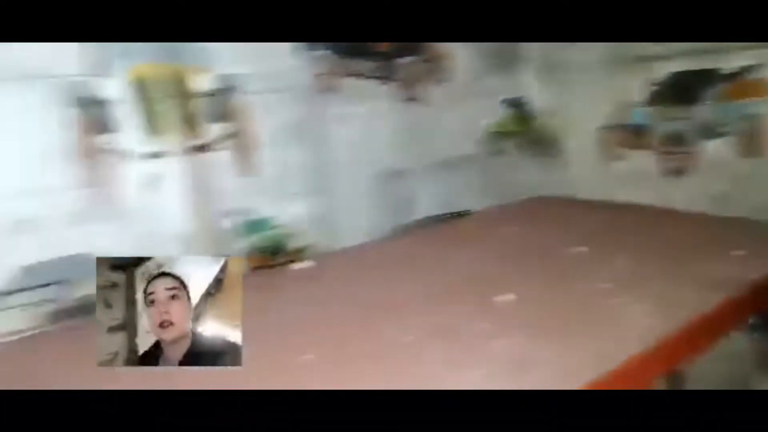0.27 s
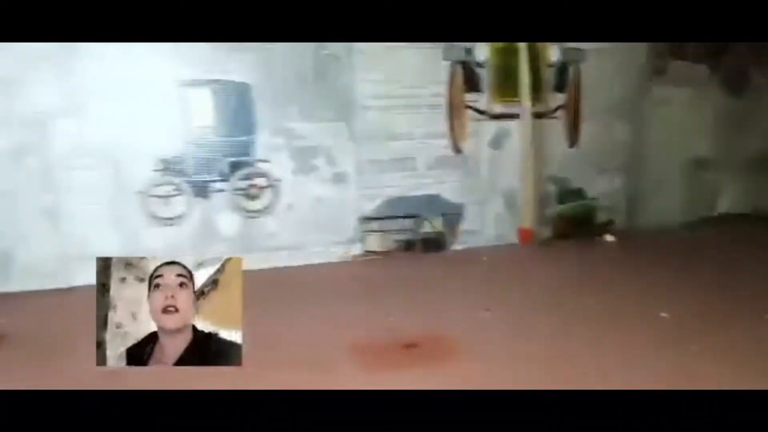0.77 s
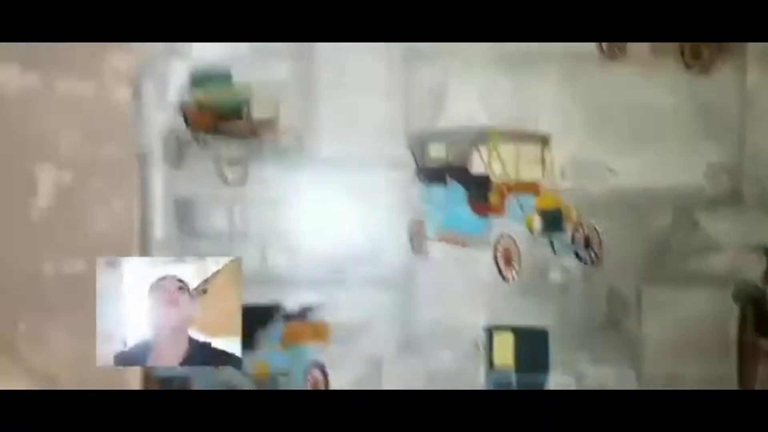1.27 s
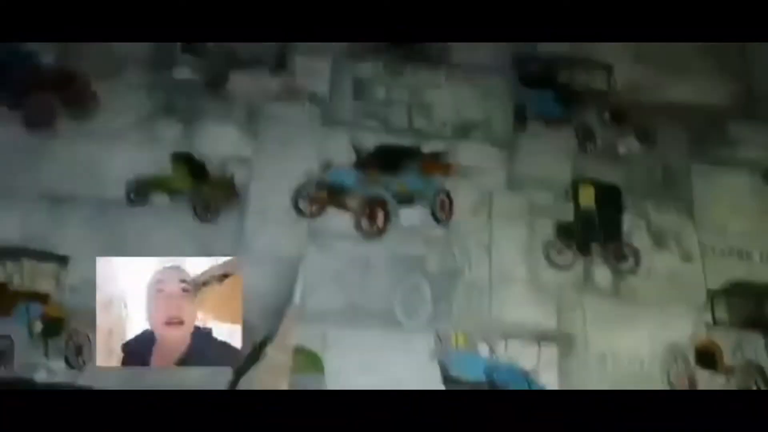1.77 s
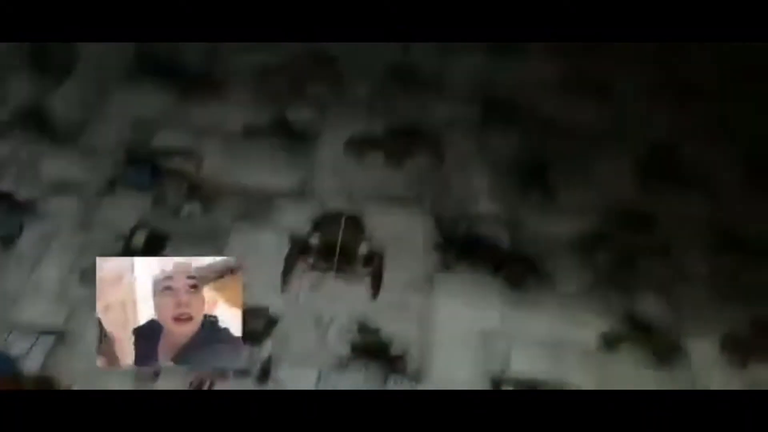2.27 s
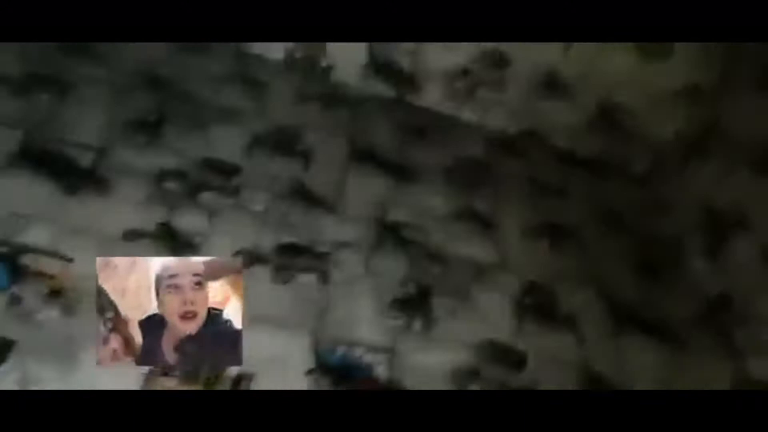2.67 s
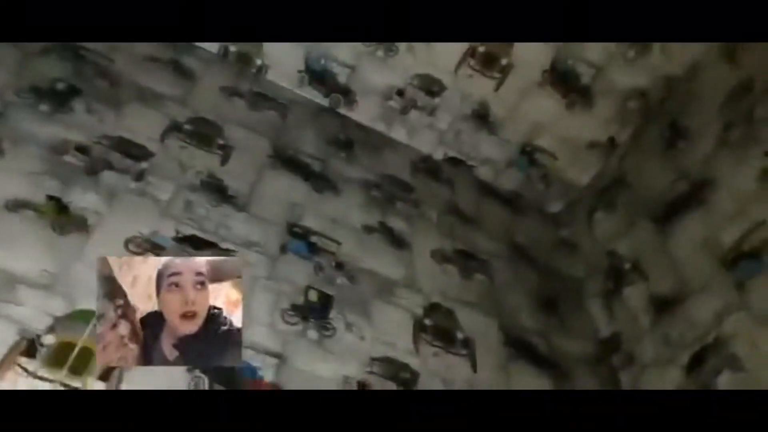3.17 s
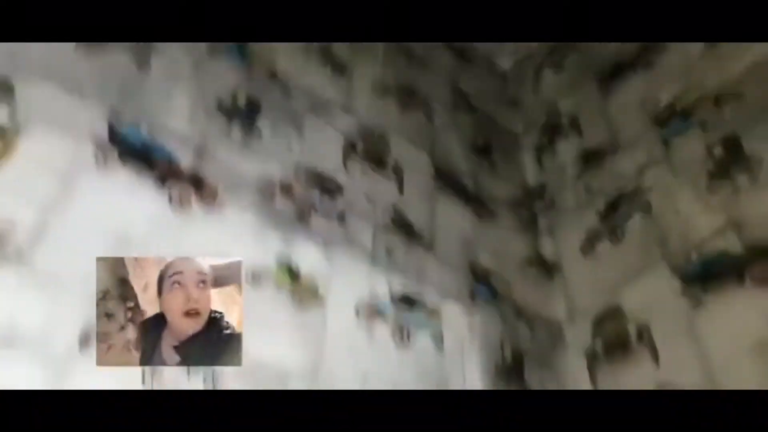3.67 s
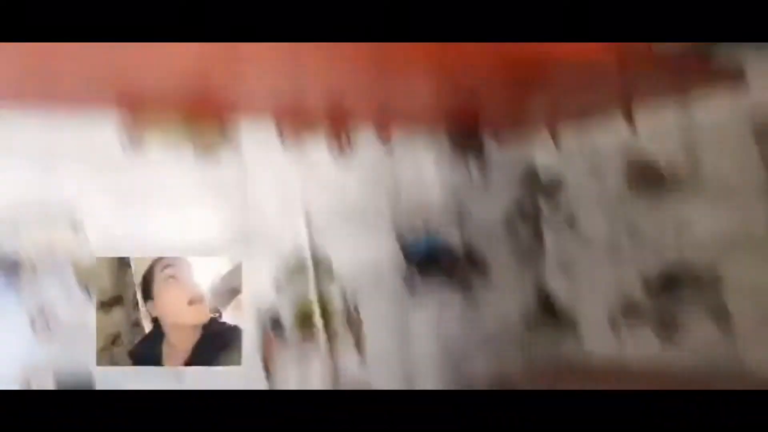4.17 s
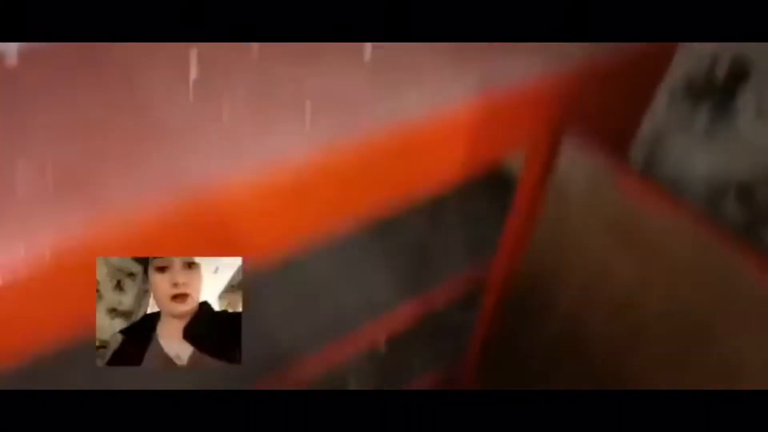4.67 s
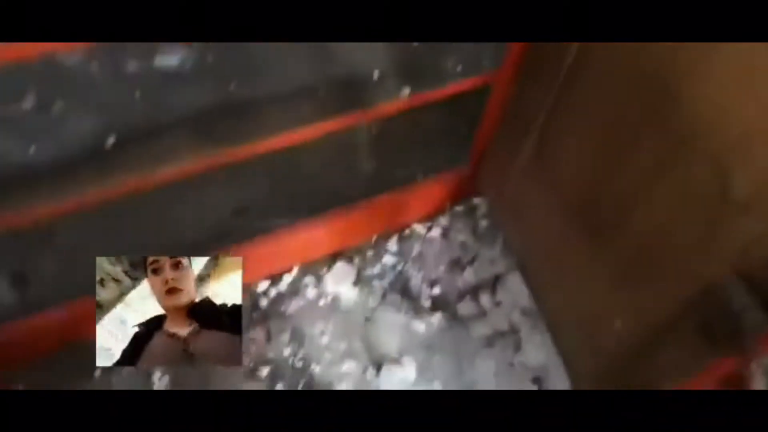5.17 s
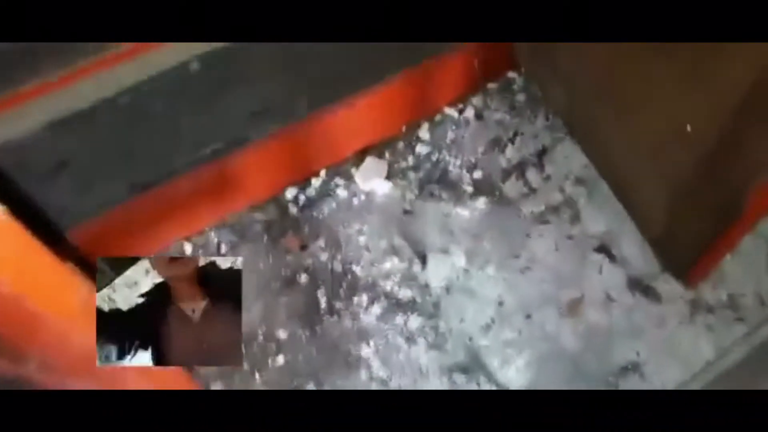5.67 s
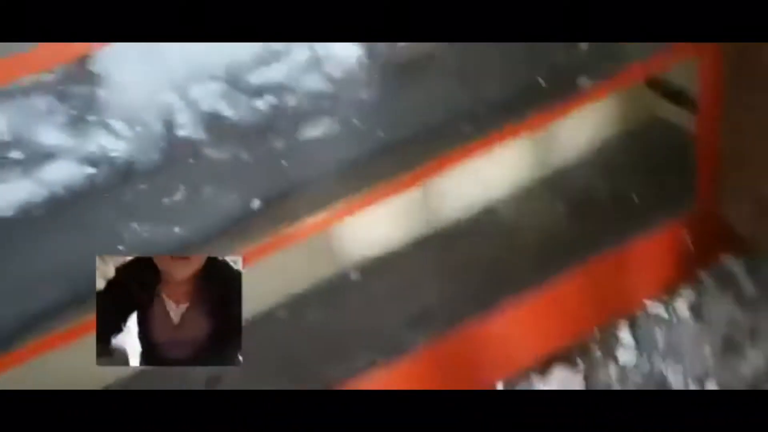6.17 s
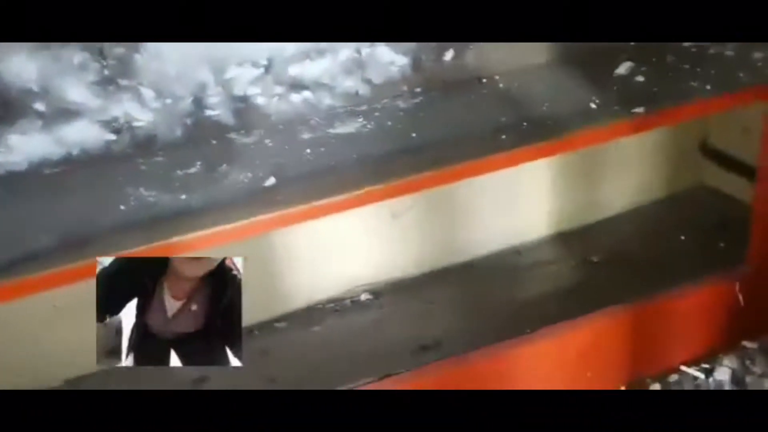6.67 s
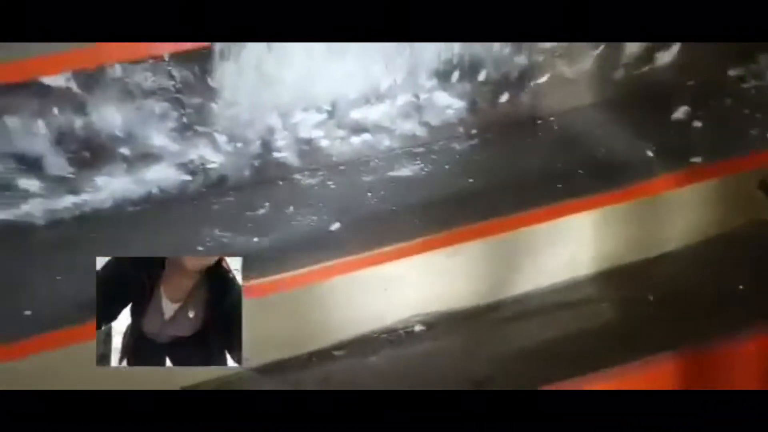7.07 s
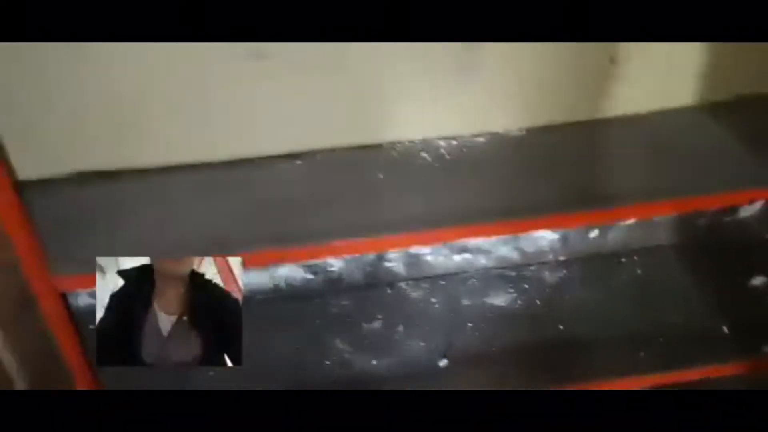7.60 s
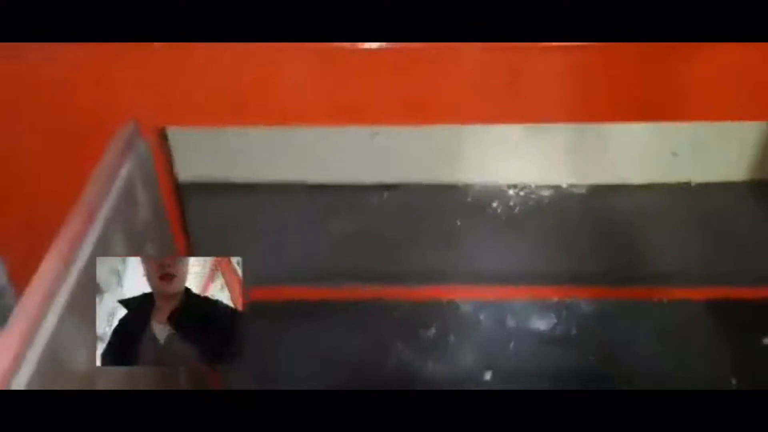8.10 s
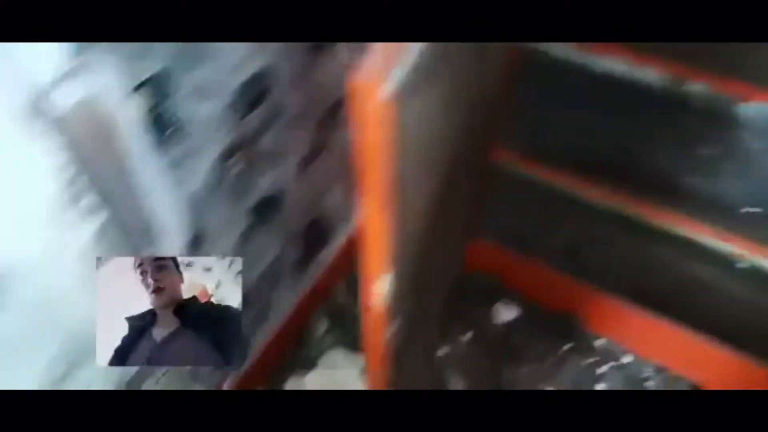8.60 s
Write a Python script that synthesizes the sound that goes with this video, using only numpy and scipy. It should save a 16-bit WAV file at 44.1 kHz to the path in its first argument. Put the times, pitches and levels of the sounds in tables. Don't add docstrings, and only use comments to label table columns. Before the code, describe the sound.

Close, careful footsteps drag through gritty debris, snapping glass shards and thudding on hollow wooden stairs, building to two violent glass crunches.

```python
import sys
import numpy as np
from scipy import signal
from scipy.fft import rfft, irfft, next_fast_len
from scipy.io import wavfile
from scipy.ndimage import uniform_filter1d, map_coordinates

SR = 44100
rng = np.random.default_rng(int(sys.argv[2]) if len(sys.argv) > 2 else 0)


def transcribe(u):
    v = np.clip(np.atleast_2d(u).T, -1, 1)
    q = np.round(v * 32767).astype(np.int16)
    wavfile.write(sys.argv[1], SR, q)


def amplitude_ratio(level_db):
    exponent = np.asarray(level_db, float) / 20
    return 10 ** exponent


N = 389844

# (time [s], left-right level [dB])
TURN = [(0, -5), (1.0, -6.5), (1.3, -2.5), (1.8, -3), (2.2, -6), (2.75, -2), (3.2, 2), (4.6, -7),
        (5.1, -3.5), (6.3, -7), (6.8, -1), (7.2, 0), (7.8, -2), (8.2, -4), (8.84, -3.5)]


def unit(x):
    return x / np.sqrt(np.mean(x ** 2) + 1e-20)


def along(points, hz):
    f, v = np.transpose(points)
    return np.interp(np.log(hz + 1), np.log(f + 1), v)


def curves(rows):
    s, *cols = np.transpose(rows)
    return [np.interp(np.arange(N) / SR, s, c) for c in cols]


def wobble(rate):
    grid_s = np.arange(0, N / SR + .01, .001)
    knots = rng.standard_normal(int(N * rate / SR) + 4)
    return np.interp(np.arange(N) / SR, grid_s, map_coordinates(knots, [grid_s * rate]))


def patches(shape, bins, frames):
    field = uniform_filter1d(rng.standard_normal(shape), bins, -2)
    return unit(uniform_filter1d(field, frames, -1))


def swells(rows, rise_s, bend):
    t = np.arange(0, N / SR + .01, .001)
    power = 0
    for s, db, fall_s, *layer_db in rows:
        away = np.where(t < s, (s - t) / (rise_s or fall_s), (t - s) / fall_s)
        level_db = db - 20 * away ** bend
        power = power + amplitude_ratio(np.add.outer([0, *layer_db], level_db)) ** 2
    return np.array([np.interp(np.arange(N) / SR, t, p) for p in power])


def filtered(x, response):
    m = next_fast_len(N + SR // 2)
    return irfft(rfft(x, m) * response(np.fft.rfftfreq(m, 1 / SR)), m)[..., :N]


def coloured(x, spectrum):
    return filtered(x, lambda hz: unit(amplitude_ratio(along(spectrum, hz))))


def pan(db):
    return amplitude_ratio(np.array([db / 2, -db / 2]))


def ports(pair, lag_s, near=0):
    # (frequency [Hz], left-right likeness [0-1])
    alike = [(40, 0.5), (200, 0.823), (600, 1), (1500, 0.22), (5000, 0.097), (12000, 0.17)]
    m = next_fast_len(N + 4096)
    hz = np.fft.rfftfreq(m, 1 / SR)
    likeness = near + (1 - near) * along(alike, hz)
    angle = np.arccos(np.clip(likeness, -1, 1)) / 2
    mid, side = rfft(pair, m) * [np.cos(angle), np.sin(angle)]
    late = np.exp(-1j * np.pi * hz * lag_s)
    return irfft(np.array([(mid + side) * late, (mid - side) / late]), m)[:, :N]


def hush():
    # (frequency [Hz], level [dB per Hz])
    air = [(90, -29), (150, -0.5), (263, -5.5), (684, -16.5), (1220, -16), (3400, -22.5), (7400, -19),
           (13000, -28.5)]
    return amplitude_ratio(-65 + 0.52 * wobble(8.9)) * coloured(rng.standard_normal((2, N)), air)


def hand_shake():
    # (time [s], level [dB])
    unrest = [(0.0, -60.5), (0.81, -69.5), (1.23, -56), (1.72, -65.5), (5.02, -64.5), (5.07, -66),
              (5.19, -73), (5.24, -52), (5.39, -69), (5.91, -48.5), (5.98, -74), (6.03, -58.5), (7.8, -64),
              (7.85, -78), (8.0, -54), (8.84, -69.5)]
    # (frequency [Hz], level [dB per Hz])
    rumble = [(12, -28), (25, -4.5), (50, 5), (75, -8.5), (120, -39)]
    noise = amplitude_ratio(4.1 * wobble(7.4)) * rng.standard_normal((2, N))
    return amplitude_ratio(curves(unrest)[0]) * coloured(noise, rumble)


def boom(modes):
    def wood(f):
        return sum((-1) ** k * amplitude_ratio(db) * 1j * f * width / (hz * hz - f * f + 1j * f * width)
                   for k, (hz, width, db) in enumerate(modes))
    return unit(filtered(amplitude_ratio(2.1 * wobble(14)) * rng.standard_normal((2, N)), wood))


def stairs():
    # (time [s], tread level [dB], time to lose 20 dB [s], joist level [dB])
    loads = [(.2, -52, 0.4, -2.5), (.91, -52.5, 0.76, -0.5), (1.16, -47.5, 0.4, -3.5),
             (1.28, -57.5, 1.4, -3), (1.63, -52, 0.24, -8), (2.09, -47, 0.06, -4), (2.5, -60, 0.5, -5),
             (3.8, -53, 0.66, -6), (4.4, -63.5, 2.5, -6.5), (4.99, -55, 1, -19), (5.1, -39, 0.14, -4),
             (5.4, -49, 0.47, -5), (5.72, -48.5, 0.7, -6.5), (6.1, -44.5, 0.1136, -10.5),
             (6.36, -50, 0.32, -11), (6.81, -42.5, 0.21, -14.5), (7.41, -57.5, 0.6, -1.5),
             (7.78, -43, 0.18, -16), (7.95, -40, .22, -12), (8.17, -44.5, 0.15, -1.5),
             (8.49, -55, 0.26, -12), (8.72, -53, 0.04, -19)]
    # (frequency [Hz], width [Hz], level [dB])
    tread_modes = [(183, 22.4, 2.5), (205.3, 22.2, 2.5), (256, 17.6, 1.5), (380, 280, -12.5)]
    # (frequency [Hz], width [Hz], level [dB])
    joist_modes = [(88.7, 6.8, 4.5), (128.5, 16, 1)]
    rest_db = -67.5
    tread, joist = np.sqrt(swells(loads, rise_s=0.052, bend=1.02) + amplitude_ratio(rest_db) ** 2)
    steps = amplitude_ratio(-1.0) * (tread * boom(tread_modes) + amplitude_ratio(1.8) * joist * boom(joist_modes))
    low = ports(steps + hand_shake(), lag_s=.0001) + knocks()
    return low * pan(3.8)[:, None]


def crackle(rate, spread_db, hiss, patchy_db):
    slips = (rng.random(N) < rate / SR) * amplitude_ratio(spread_db * rng.exponential(size=N))
    decay = amplitude_ratio(-60 * np.arange(200) / SR / 0.0045)
    shape = np.convolve(slips, decay)[:N]
    force = np.sqrt(hiss + (1 - hiss) * unit(shape) ** 2)
    z = signal.stft(force * rng.standard_normal((2, N)), nperseg=512)[2]
    colour = amplitude_ratio(patchy_db * patches(z.shape[1:], bins=3, frames=6))
    return unit(signal.istft(z * colour, nperseg=512)[1][:, :N])


def debris(source, grit, plaster, dust):
    # (frequency [Hz], level [dB per Hz])
    grit_hz_db = [(900, -76), (1400, -14.5), (1800, -1.5), (2600, 1.5), (3300, -3.5), (4100, -3),
                  (4900, -6.5), (5800, -19.5), (7500, -39)]
    # (frequency [Hz], level [dB per Hz])
    plaster_hz_db = [(110, -43.5), (200, -7), (320, -13), (600, -2.5), (1000, 0.5), (1400, 3),
                     (1900, -11.5), (3000, -58)]
    # (frequency [Hz], level [dB per Hz])
    dust_hz_db = [(200, -39), (3500, -30), (4800, -15), (5800, -5.5), (7100, 0.5), (8000, -2.5),
                  (10000, -5.5), (13000, -10)]
    return (grit * coloured(source, grit_hz_db)
            + plaster * coloured(source, plaster_hz_db)
            + dust * coloured(source, dust_hz_db))


def scuff():
    # (time [s], grit level [dB], time to lose 20 dB [s], plaster [dB], dust [dB])
    landings = [(.032, -53, 0.0953, 2, -13), (1.12, -47, 0.9, -3, 0.5), (2.787, -44, 0.1475, -2.5, -2.5),
                (3.17, -73, .15, 6, 3.5), (3.663, -41, 0.22, -9.5, -9), (4.055, -51, 0.26, -25, 3),
                (4.929, -42, 0.2221, -9, -19), (6.794, -43.5, 0.08, -5, -25), (6.83, -55, 0.05, -2, -22.5),
                (7.158, -28.5, 0.2, -18, 0), (7.814, -27.5, 0.15, -14, 0), (8.0, -43, .16, -9, 5),
                (8.165, -50.5, 1.6, -9, 2)]
    # (middle time [s], grit level [dB], time to lose 20 dB each way [s], plaster [dB], dust [dB])
    drags = [(.3, -64.5, 0.4, 3.5, -4.5), (.92, -62, .1, 7, -6), (.46, -73, 4, -14, -11),
             (.75, -69.5, 6, -12, -7), (1.08, -47.5, .19, -6, 2), (1.4, -45, 0.435, -5, -1.5),
             (1.76, -48.5, 0.28, -4.5, -5.5), (2.05, -53.5, 0.56, -14.5, 0.5), (2.6, -62, 0.28, -2, -2),
             (3.55, -59, 0.22, -19, -2), (3.64, -56, .05, -29.5, 1), (3.85, -52, 0.32, -1, -0.5),
             (4.33, -48.5, 0.3155, -8.5, -3), (4.54, -43, 0.1893, -21.5, -1), (4.82, -48, 0.38, -13, -1.5),
             (5.0, -42, .06, -10, -6), (5.35, -42, 0.2453, -9.5, -0.5), (5.58, -39, 0.346, -17, 2),
             (5.9, -39, 0.36, -21.5, 3), (5.543, -39, .02, -20, -3), (5.63, -43, .06, -18, 2),
             (5.765, -43, .05, -20, 5), (5.85, -43, .045, -20, 6), (5.97, -46, .06, -20, 5),
             (6.2, -49.5, 0.23, -12, 6), (6.335, -43.5, 0.1, -18.5, -2.5), (6.6, -55, 0.57, -11.5, 0),
             (6.71, -60, .04, 4, -8), (7.03, -56, 0.14, -10.5, -1), (7.5, -51.5, 0.53, -7.5, 1.5),
             (7.76, -41, 0.07, -17, -0.33), (7.94, -31, 0.11, -9, -1)]
    power = swells(landings, rise_s=0.0033, bend=1.48) + swells(drags, rise_s=None, bend=1.92)
    grit, plaster, dust = np.sqrt(power)
    source = crackle(rate=900, spread_db=2.2, hiss=0.78, patchy_db=3)
    source = ports(source, lag_s=0.0002055, near=.15)
    return pan(curves(TURN)[0]) * amplitude_ratio(0.78) * debris(source, grit, plaster * amplitude_ratio(3.0), dust * amplitude_ratio(3.0))


def snaps():
    # (time [s], peak level [dB], plaster [dB],
    # dust [dB])
    single_shards = [(0.038, -42.5, -8, -10), (0.341, -49.5, -10, -5.5), (0.447, -51.5, -9, -2.5),
                     (0.911, -47, -4, -8), (1.014, -40, -7, 3), (1.1223, -36, -6, -13),
                     (1.1379, -31.5, 8, -10), (1.197, -36, 3, -6), (1.2503, -30, 3, -3), (1.258, -39, 7, -6),
                     (1.2927, -36, -10, 7), (1.303, -36, -8, 5), (1.379, -34, 4, -1), (1.387, -33, 5, -1.5),
                     (1.398, -39, 6, -4), (1.4598, -39, -4, -4), (1.5413, -34.5, 3, -17),
                     (1.8682, -51, -16, 0.5), (2.4874, -52.5, -6, 2), (2.7862, -36.5, -31, 0),
                     (2.8507, -33, -12, -2), (3.4471, -58, -20, 6), (3.508, -48.5, -15, 1.5),
                     (3.662, -39, -13, 8), (3.685, -23.5, -19.5, -12), (3.6952, -29.5, -3, -22),
                     (5.2829, -32.5, -18, 0),
        (5.3847, -33, 1.5, -12),
        (5.542, -23.5, -35, -4),
        (5.5752, -33, -26, -11),
        (6.0804, -29, -9, -6),
        (6.11, -40, 0, -9),
        (6.7914, -36, -3.5, -19.5),
    ]
    # (time [s], peak level [dB], plaster [dB], dust [dB], length [ms])
    splinters = [(4.8472, -45, -2, 3, 25), (4.9275, -27, 0, -6, 3), (4.93, -36, -10, 10, 1.5),
                 (4.934, -27, -10, -12, 6), (4.947, -34, -8, -8, 8), (4.9640, -29, -23, 6, 7),
                 (4.974, -29, -15, 3, 10), (4.9889, -24, -2, -9, 5), (4.994, -29, -8, -6, 6),
                 (4.999, -28, -8, -12, 8), (5.005, -29, -8, -10, 9), (5.02, -35, -10, 0, 20),
                 (5.0463, -27, -12, -6, 5), (5.051, -27, -15, -8, 6), (5.06, -35, -6, -6, 18),
                 (5.0885, -25, 4, -2, 2.5), (5.093, -34, -5, 11, 5), (5.069, -39, -8, 4, 12)]
    # (time [s], peak level [dB], plaster [dB], dust [dB], length [ms])
    panes = [(5.109, -41, -8, 0, 8), (5.12, -43, -8, 0, 10), (7.156, -18, -13, 10, 5),
             (7.161, -19, -14, 10, 3.5), (7.165, -19, -16, 10, 3), (7.171, -30, -14, 8, 10),
             (7.18, -29, -14, 7, 8), (7.192, -27, -14, 5, 6), (7.205, -31, -14, 7, 10),
             (7.799, -36, -18, -3, 10), (7.808, -32, -18, 0, 5), (7.811, -26, -18, 3, 5),
             (7.814, -17, -20, 7, 5), (7.8172, -9, -16, 3, 2), (7.82, -17, -16, 6, 5),
             (7.8225, -15, -16, 7, 6), (7.827, -15, -18, 7, 5), (7.833, -25, -14, 1, 5),
             (7.838, -25, -18, 0, 5), (7.85, -28, -14, 9, 16), (7.868, -24, -18, 6, 5),
             (8.047, -38, -12, 5, 5), (8.094, -36, -12, 6, 5), (8.097, -36, -20, 18, 4),
             (8.1, -36, -15, 25, 4), (8.109, -40, -10, 14, 5), (8.122, -38, -13, 12, 6),
             (8.136, -42, -16, 9, 6), (8.146, -38, -16, 8, 5), (8.153, -40, -12, 17, 3),
             (8.1555, -37, -12, 21, 2), (8.16, -48, -12, 14, 8)]
    whole = [(s, db, plaster_db, dust_db, 9.96 - 0.15 * (db + 35) - 0.13 * dust_db)
             for s, db, plaster_db, dust_db in single_shards]
    force = np.zeros((3, N + SR))
    ms = np.arange(SR // 14) * 1000 / SR
    rise_ms = 1.3
    for s, db, plaster_db, dust_db, length_ms in [*whole, *splinters, *panes]:
        blow = amplitude_ratio(db - 3) * np.exp(-(ms / length_ms) ** 1.5) * (1 - np.exp(-ms / rise_ms))
        layers = amplitude_ratio(np.array([0, plaster_db, dust_db]))[:, None]
        force[:, round(s * SR):][:, :len(ms)] += layers * blow
    source = crackle(rate=4000, spread_db=2.2, hiss=.45, patchy_db=2)
    source = ports(source, lag_s=.0003, near=.4)
    return pan(curves(TURN)[0] - 0.2) * debris(source, *force[:, :N])


def walls(x):
    # (frequency [Hz], t60 [s])
    decay = [(200, 0.24), (1000, 0.26), (4000, 0.26), (12000, 0.13)]
    # (time [s], level [dB])
    answer = [
        (0, -5),
        (3.0, -5),
        (4.0, -6),
        (4.9, -9),
        (5.3, -7),
        (6.9, -6),
        (7.3, -6),
        (7.8, -8),
        (8.05, -18),
        (8.84, -18),
    ]
    hz, t, z = signal.stft(rng.standard_normal((2, SR // 2)), SR, nperseg=256)
    tail = signal.istft(z * amplitude_ratio(-60 * t / along(decay, hz)[:, None]), SR, nperseg=256)[1]
    sent = np.pad(amplitude_ratio(curves(answer)[0]) * x, ((0, 0), (250, 0)))
    return signal.fftconvolve(sent, tail / np.linalg.norm(tail[0]), axes=1)[:, :N]


def knocks():
    # (time [s], peak level [dB], ring [Hz], t60 [s])
    blows = [(0.866, -35, 102.4, 0.35), (1.221, -33.5, 84, 0.3), (2.086, -30.5, 128.5, 0.063),
             (3.746, -36, 129, 0.24), (5.05, -38, 69, 0.45), (4.949, -37, 272.4, 0.38),
             (5.049, -36, 210, 0.23), (5.079, -37, 211, 0.25), (5.44, -30, 187, 0.162),
             (5.77, -39.5, 124, 0.34), (6.329, -42, 282, 0.19), (6.809, -34, 183, 0.22),
             (6.84, -30, 165, 0.12), (7.371, -36, 181, 0.46), (7.921, -30.5, 170.4, 0.3),
             (8.119, -33, 196.9, 0.35), (8.406, -45, 111, 0.22),
             (.88, -49.5, 406.4, 0.64), (2.5, -45, 132, 0.246), (2.8, -44, 880, .2), (2.845, -42, 790, .3),
            (2.845, -45, 440, .3), (2.88, -44, 800, .2), (2.86, -43.5, 341, 0.325), (3.5, -52.5, 380, .2),
            (4.221, -45, 95, 0.386), (5.21, -41, 1045, 0.6), (5.27, -46, 1150, .6), (5.34, -46, 1220, .6),
            (2.091, -27, 329, 0.0376), (2.05, -39.5, 400, 0.027), (6.069, -30, 172, 0.8),
            (6.09, -33.5, 125.2, 0.7), (7.165, -38, 624, 0.58), (7.819, -20, 373, 0.068),
            (8.411, -29.5, 298, 0.024)]
    out, t = np.zeros(N + SR), np.arange(SR // 2) / SR
    for s, db, hz, t60 in blows:
        ring = np.sin(2 * np.pi * hz * t) + 0.74 * np.sin(2 * np.pi * hz * 1.07 * t)
        rise = 1 - np.exp(-t * hz / 1.42)
        out[round(s * SR):][:len(t)] += amplitude_ratio(db - 7.0 - 60 * t / t60) * rise * ring
    return out[:N]


def pings():
    # (time [s], peak level [dB], ring [Hz], t60 [s])
    shards = [(4.9635, -34, 6400, .04), (4.964, -38, 11200, .03), (4.968, -38, 3300, .05),
              (5.047, -38, 6000, .05), (5.052, -36, 2700, .06), (5.093, -34, 11000, .03),
              (5.094, -36, 7400, .04), (5.576, -34, 3100, .04), (7.157, -24, 7800, .06),
              (7.158, -26, 4200, .05), (7.159, -24, 11500, .05), (7.167, -28, 13000, .04),
              (7.164, -26, 10300, .06), (7.826, -18, 10800, .03), (7.829, -18, 2400, .04),
              (8.099, -32, 12200, .04), (8.11, -40, 2100, .04), (8.114, -40, 12500, .02),
              (8.121, -40, 4600, .06), (8.137, -40, 4300, .07), (8.147, -39, 4400, .04)]
    out, t = np.zeros((2, N + SR)), np.arange(SR // 10) / SR
    late = t - np.array([[.0002], [0]])
    for s, db, hz, t60 in shards:
        ring = np.sin(2 * np.pi * hz * late) + .7 * np.sin(2 * np.pi * (hz + 170) * late)
        out[:, round(s * SR):][:, :len(t)] += amplitude_ratio(db - 60 * t / t60) * (1 - np.exp(-t / .001)) * ring
    return pan(curves(TURN)[0]) * out[:, :N]


def scene():
    breaks = snaps() + pings()
    return hush() + stairs() + scuff() + breaks + walls(breaks)


def ducked(x):
    threshold_db, slope, window_s, bass_hz = -28, 2.36, .045, 150
    span = int(window_s * SR)
    loud = uniform_filter1d(np.mean(x ** 2, axis=0), span, origin=(span - 1) // 2)
    over_db = np.maximum(10 * np.log10(np.abs(loud) + 1e-12) - threshold_db, 0)
    bass = filtered(x, lambda hz: 1 / (1 + (hz / bass_hz) ** 6))
    x = x - bass * (1 - amplitude_ratio(-slope * over_db))
    return x / (1 + np.abs(x) ** 4) ** (1 / 4)


def starved(x):
    # (frequency [Hz], share of time the band is dropped [0-1])
    weak = [(2200, 0), (3400, .17), (4000, .08), (4600, .28), (5200, .36), (5700, .01), (8000, .03),
            (8400, .5), (9000, .85), (9400, .8), (9600, .03), (11000, .04), (13000, .09)]
    spares_loud = .055
    hz, t, z = signal.stft(x, SR, nperseg=1024)
    level_db = 10 * np.log10(np.mean(np.abs(z) ** 2, axis=(0, 1)) + 1e-14)
    field = patches(z.shape[1:], bins=8, frames=6)
    field = field + spares_loud * (hz[:, None] < 8000) * level_db
    rank = np.argsort(np.argsort(field, axis=1), axis=1) / len(t)
    gain = np.where(rank < along(weak, hz)[:, None], amplitude_ratio(-41), 1)
    return signal.istft(z * gain, SR, nperseg=1024)[1][:, :N]


def pinched(x):
    # (time [s], length [s], lost above [Hz])
    pinches = [
        (4.925, .042, 11800),
        (4.97, .01, 12800),
        (7.146, .005, 10200),
        (7.796, .013, 8500),
        (7.817, .016, 12000),
        (8.107, .005, 9400),
        (8.129, .007, 8000),
    ]
    out = x.copy()
    for s, length_s, hz in pinches:
        span = slice(round((s - .005) * SR), round((s + length_s + .005) * SR))
        highpass = signal.butter(8, hz, "high", fs=SR, output="sos")
        treble = signal.sosfiltfilt(highpass, x[:, span])
        out[:, span] -= treble * signal.windows.tukey(treble.shape[1], .016 / (length_s + .01))
    return out


def band_limit(x):
    return signal.sosfilt(signal.butter(12, 14390, fs=SR, output="sos"), x)


def record(dry):
    # (frequency [Hz], level [dB])
    case = [(8000, 0.5), (8500, -5.5), (8900, -8), (9400, -3), (9600, 0.5), (13050, 1.5), (13250, -40),
            (14000, -70)]
    # (frequency [Hz], left-right level [dB])
    lean = [(400, 1), (2500, 0.02), (8000, 1), (11000, -1.1)]
    heard = filtered(ducked(dry), lambda hz: amplitude_ratio(along(case, hz)) * pan(along(lean, hz)))
    return band_limit(pinched(starved(heard)))


dry = scene()
out = record(dry)
transcribe(out)
```